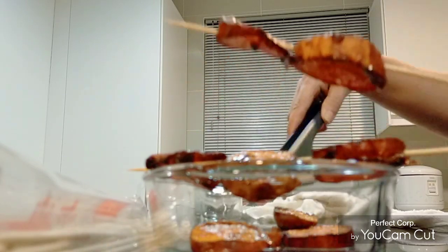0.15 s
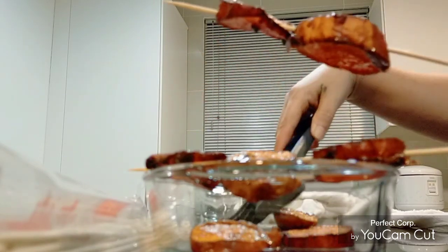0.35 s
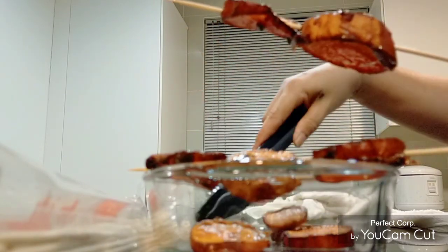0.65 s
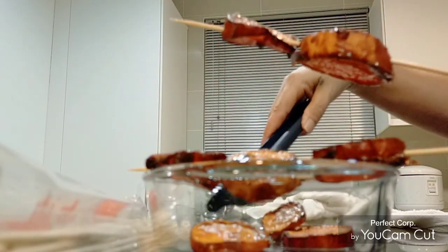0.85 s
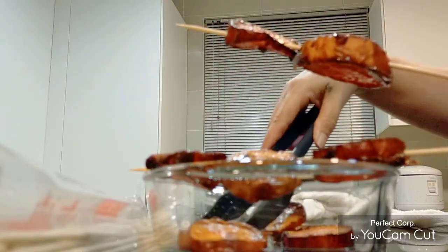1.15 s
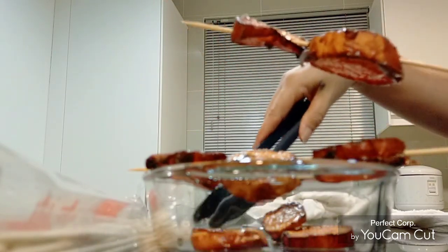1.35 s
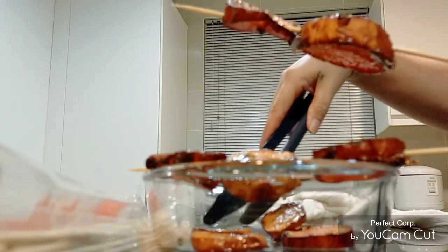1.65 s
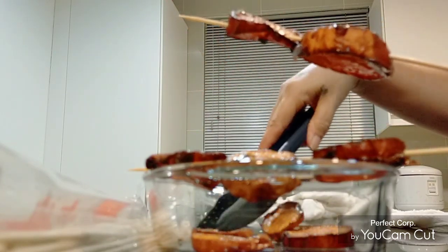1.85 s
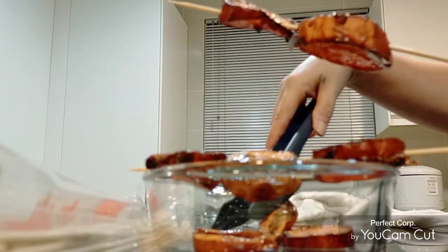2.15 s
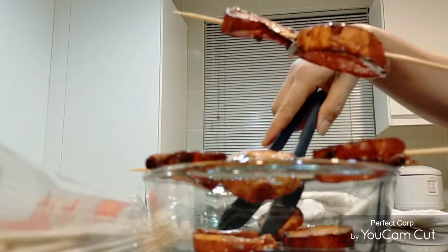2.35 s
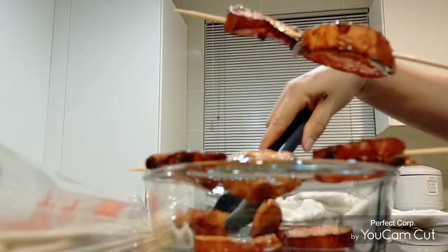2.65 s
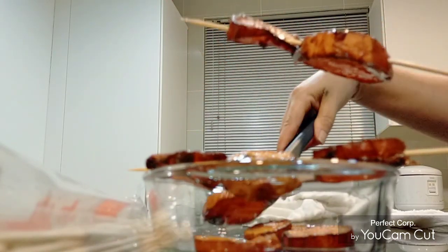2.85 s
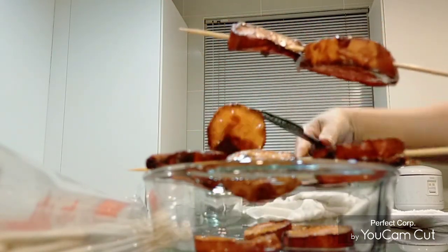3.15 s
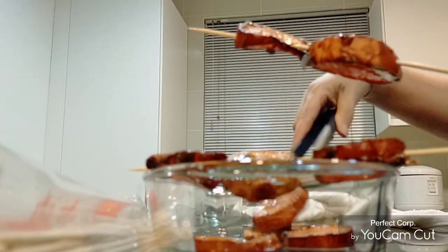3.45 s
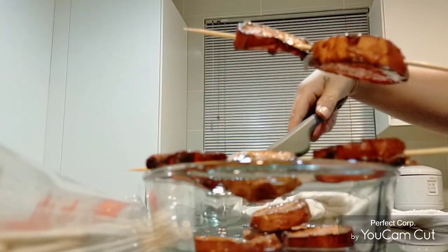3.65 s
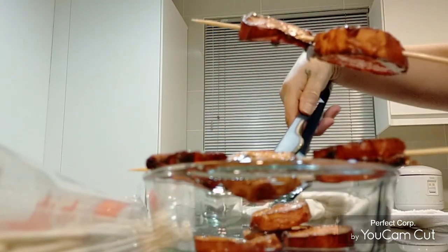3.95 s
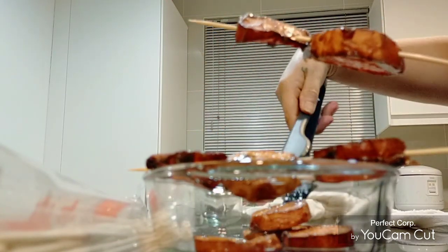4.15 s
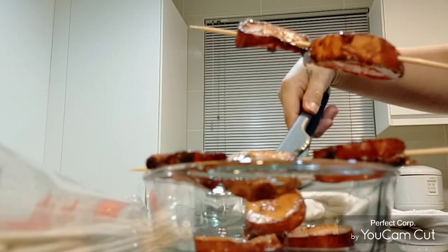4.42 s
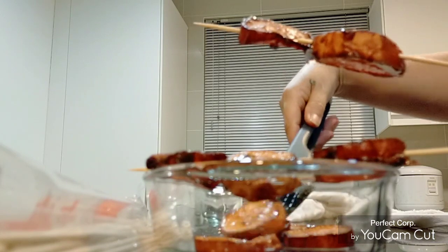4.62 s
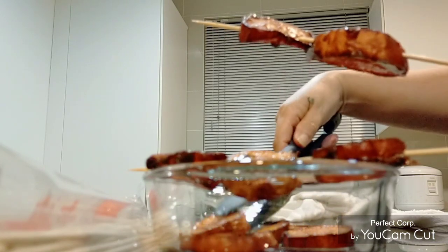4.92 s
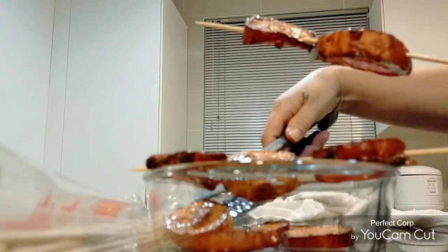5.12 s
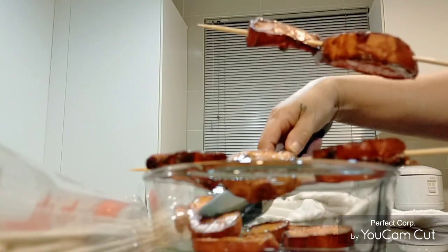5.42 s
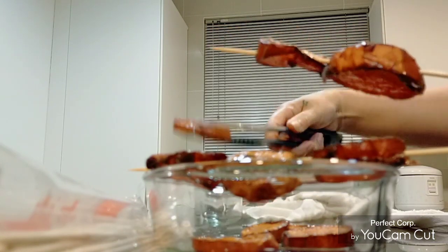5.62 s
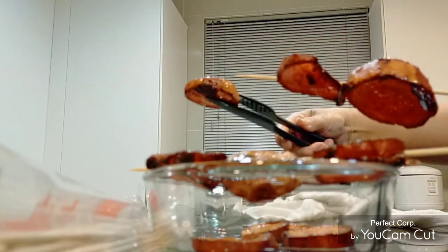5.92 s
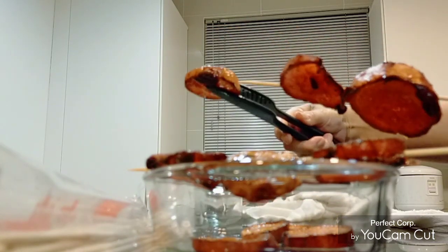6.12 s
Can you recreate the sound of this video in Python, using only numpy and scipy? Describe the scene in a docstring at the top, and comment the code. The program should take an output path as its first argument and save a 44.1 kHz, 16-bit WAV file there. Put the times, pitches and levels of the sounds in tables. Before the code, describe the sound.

Plastic-tipped tongs knock and clink against a glass bowl of sticky food, close by, over a faint appliance hum.

```python
"""Tongs in a glass bowl

Plastic-tipped tongs pick glazed slices of food out of a glass bowl, close by, in a small hard-walled
kitchen. Each knock rings the food-damped bowl and the arms of the tongs in its own proportion.
The sticky glaze crackles softly under the tips. An appliance hums behind it all, and its low
drone steps up once."""
import sys
import numpy as np
from scipy import signal
from scipy.fft import rfft, irfft
from scipy.io import wavfile
from scipy.ndimage import map_coordinates

SR = 44100
rng = np.random.default_rng(int(sys.argv[2]) if len(sys.argv) > 2 else 0)


def store_pcm(level_fs):
    """Save levels as 16-bit WAV."""
    pcm = np.round(np.clip(level_fs, -1, 1) * 32767).astype(np.int16)
    wavfile.write(sys.argv[1], SR, np.atleast_2d(pcm).T)


N = 276987


def from_db(db):
    """Amplitude ratio of a level in decibels."""
    return 10 ** (np.asarray(db) / 20)


def unit_rms(x):
    """Normalisation to unit mean power."""
    return x / np.sqrt(np.mean(x ** 2) + 1e-20)


def at_hz(points, hz):
    """Interpolation of (f/Hz, value) points on a logarithmic frequency axis."""
    f, value = np.transpose(points)
    return np.interp(np.log(np.maximum(hz, 1)), np.log(f), value)


def butter(x, hz, kind, order=2):
    """Causal Butterworth filter."""
    return signal.sosfilt(signal.butter(order, np.clip(hz, 10, .45 * SR), kind, fs=SR, output="sos"), x)


def colour(x, spectrum):
    """Zero-phase spectral shaping by (f/Hz, level/dB) points."""
    return irfft(rfft(x) * from_db(at_hz(spectrum, np.fft.rfftfreq(len(x), 1 / SR))), len(x))


def drift(knots_per_s):
    """Smooth random process of unit rms: a cubic spline through Gaussian values."""
    knots = rng.standard_normal(int(knots_per_s * N / SR) + 4)
    return unit_rms(map_coordinates(knots, [1 + np.arange(N) * knots_per_s / SR], order=3))


def wavering_tone(t, hz, unsteadiness, knots_per_s=9.0):
    """Narrow-band modulation: a steady phasor plus a random one wavers in amplitude and phase."""
    steady = np.sqrt(2 * (1 - unsteadiness ** 2))
    wander = unsteadiness * (drift(knots_per_s) + 1j * drift(knots_per_s))
    return np.real((steady + wander) * np.exp(2j * np.pi * (hz * t + rng.random())))


def appliance(drone_hz=135.8, drone_db=-63, step_s=4.2, rise_s=.15, step_db=4):
    """Line spectrum over broadband noise: a hum, a drone that steps up once, and a steady rush of air."""
    # partials of the hum: f/Hz, rms level/dB, unsteadiness (0-1)
    partials = [(48.3, -62, .25), (157, -65, .8), (206, -60.5, .6), (298, -67, .8), (4080, -88, 1)]
    # low band of the air noise: f/Hz, relative spectral level/dB
    rumble_spectrum = [(20, 0.5), (32, -5), (42, -18), (75, -10.5), (115, -5.5), (145, -0.5), (200, 2),
                       (300, 1), (400, -3), (500, -3), (680, -4.5), (830, 2.5), (1000, -5)]
    # high band of the air noise: f/Hz, relative spectral level/dB
    hiss_spectrum = [(1000, -4.5), (1300, -4), (1550, -9), (2100, -11.5), (2700, -16), (3400, -25),
                     (4100, -28.5), (5000, -34.5), (6500, -36.5), (8200, -35), (10000, -40.5),
                     (12500, -38.5), (15000, -33.5)]
    rumble_db, hiss_db = -50.5, -56.5
    t = np.arange(N) / SR
    hum = sum(from_db(db) * wavering_tone(t, hz, unsteadiness) for hz, db, unsteadiness in partials)
    step = np.clip((t - step_s) / rise_s, 0, 1)
    drone = from_db(drone_db + step_db * step) * wavering_tone(t, drone_hz, unsteadiness=0.59)
    rumble = butter(colour(rng.standard_normal(N), rumble_spectrum), 1047, "low", order=6)
    hiss = butter(colour(rng.standard_normal(N), hiss_spectrum), 1024, "high", order=6)
    return hum + drone + from_db(rumble_db) * unit_rms(rumble) + from_db(hiss_db) * unit_rms(hiss)


def ring(modes, t, low_hz, top_hz, spot_hz, spot_db=4.5, spot_octaves=0.14, spread_db=0.92):
    """Modal superposition: a blow excites damped sinusoids, chiefly those between its band edges."""
    hz, peak_db, t60 = np.transpose(modes)[:, :, None]
    decay = np.log(1000) / t60
    excitation = 1 / np.sqrt((1 + (low_hz / hz) ** 12) * (1 + (hz / top_hz) ** 4))
    # modes that swing widely at the strike point ring louder
    lift_db = spot_db * np.exp(-.5 * (np.log2(hz / spot_hz) / spot_octaves) ** 2)
    scatter_db = spread_db * rng.standard_normal(hz.shape)
    amplitude = excitation * from_db(peak_db + lift_db + scatter_db) * 2 * decay / SR
    sign = (-1) ** np.arange(len(hz))[:, None]   # neighbours start opposed: close pairs swell and beat
    return np.sum(sign * amplitude * np.exp(-decay * t) * np.sin(2 * np.pi * hz * t), axis=0)


def crack(t, bowl_db, tongs_db, top_hz, t60=0.014, db_per_octave=3.5, usual_top_hz=5000):
    """Modal overlap: countless brief high modes blur into noise, louder and brighter at a hard contact."""
    # contact transient: f/Hz, relative level/dB
    spectrum = [(1000, -12), (2500, 13), (4500, -2), (6300, -5.5), (8300, -2), (9500, -3.5), (12000, -5.5),
                (15000, 1.5)]
    fade = from_db(-60 * t / t60)
    burst = colour(rng.standard_normal(len(t)), spectrum) * fade / np.linalg.norm(fade)
    burst = butter(burst, 950, "high", order=4)
    strength = from_db(bowl_db - 16) + from_db(tongs_db - 9.5)   # both bodies contribute
    hardness = from_db(db_per_octave * np.log2(top_hz / usual_top_hz))
    return strength * hardness * butter(burst, top_hz, "low", order=1)


def knocks():
    """Impact excitation of tongs and glass: a soft contact loses the treble, a glancing one the lows."""
    # blows: t/s, bowl level/dB, tongs level/dB, low edge f/Hz, top edge f/Hz,
    # f/Hz favoured by the strike point
    blows = [(0.406, -28, -18, 1660, 4950, 2010), (0.45, -37, -24.5, 1660, 8000, 2070),
             (0.764, -2, -30, 920, 3670, 1037), (1.298, -26, -27.5, 2900, 15200, 8600),
             (1.386, 1.5, -18, 954, 8900, 990), (1.622, -13.5, -45, 760, 3620, 890),
             (1.864, -24, -25, 780, 9000, 1220), (2.7532, -5, -14, 844, 7560, 1167),
             (2.8379, -9, -11.5, 600, 6500, 850), (3.239, -7, 4, 520, 5000, 1193),
             (3.429, -8.5, 0, 420, 1860, 2580), (3.8767, -8.5, -9.5, 1020, 6500, 3070),
             (4.046, -1.5, -10.5, 1304, 3200, 1350), (4.2251, -5, -16, 1325, 4250, 1360)]
    # modes of the bowl, the low ones damped by the food, a close pair ringing on above them:
    # f/Hz, resonance peak level/dB, t60/s
    bowl_modes = [(871.6, 22.5, 0.045), (997, 20, 0.019), (1072, 22, 0.018), (1283, 23, 0.011),
                  (1351, 21.5, 0.019), (1806, 8.5, 0.023), (2022, 20, 0.052), (2224, 12.5, 0.041),
                  (2390, 4.5, 0.0095), (3255, 16.5, .3), (3284, 11, .27), (3510, 5, .012), (4626, 13, .085),
                  (4744, 6.5, 0.031), (5510, -4.5, 0.015), (5750, -0.5, 0.063), (7080, -9, 0.027),
                  (7480, -1.5, 0.019), (8310, 3.5, 0.022), (10700, -7, 0.046), (11500, -11, .03)]
    # modes of the arms of the tongs: f/Hz, resonance peak level/dB, t60/s
    tongs_modes = [(502, 10.5, 0.042), (863, 19, 0.039), (1140, 13, 0.028), (1292, 15.5, 0.046),
                   (1410, 23.5, 0.069), (1626, 15, 0.026), (1943, 11.5, 0.029), (2139, 17.5, 0.049),
                   (2585, 16.5, 0.029), (2900, 4, 0.033), (3030, -3, 0.007), (3992, 15, 0.036),
                   (5450, -1.5, 0.046), (5830, 5, 0.064), (6400, 2, 0.23), (7480, 2.5, 0.065),
                   (8060, 0, 0.032), (10100, -1, 0.065)]
    out, t = np.zeros(N), np.arange(2 * SR // 3) / SR
    for onset_s, bowl_db, tongs_db, low_hz, top_hz, spot_hz in blows:
        bowl = from_db(bowl_db) * ring(bowl_modes, t, low_hz, top_hz, spot_hz)
        tongs = from_db(tongs_db) * ring(tongs_modes, t, low_hz, top_hz, spot_hz)
        # small bodies radiate little below their lowest sounding mode
        bodies = butter(bowl + tongs, 0.66 * low_hz, "high")
        # hand and tongs keep moving, so every knock finds its own pattern of reflections
        knock = kitchen(bodies + crack(t, bowl_db, tongs_db, top_hz))
        start = round(onset_s * SR)
        out[start:start + len(knock)] += knock[:N - start]
    return out


def kitchen(x, near_db=-4.0, near_t60=0.044, build_up_s=0.013):
    """Reverberation: direct sound, early reflections off worktop and dishes, a diffuse tail off walls."""
    # strength of the tail: f/Hz, level/dB
    tail_levels = [(400, 8), (850, 3.5), (1250, -11.5), (2000, -7.5), (5000, -11), (8000, -3), (15000, -5)]
    # reverberation time: f/Hz, t60/s
    tail_t60 = [(400, 0.36), (1000, 0.49), (3000, 0.77), (8000, 0.5), (15000, 0.31)]
    size = 2 * SR // 3
    t, hz = np.arange(size) / SR, np.fft.rfftfreq(size, 1 / SR)
    white = rfft(rng.standard_normal(size))
    build_up = np.clip(2 * t / build_up_s - 1, 0, 1)
    centres_hz, tail = np.geomspace(250, 16000, 13), 0
    for centre, weights in zip(centres_hz, np.eye(len(centres_hz))):
        band = irfft(white * at_hz(np.c_[centres_hz, weights], hz), size)   # triangular pass band
        fade = build_up * from_db(-60 * t / at_hz(tail_t60, centre))
        tail += from_db(at_hz(tail_levels, centre)) * band * fade / np.linalg.norm(fade)
    near = rng.standard_normal(size) * from_db(-60 * t / near_t60) * (t > .001)
    # small things scatter only short waves
    near = butter(near / np.linalg.norm(near), 1500, "high", order=1)
    return x + signal.fftconvolve(x, tail + from_db(near_db) * near)[:len(x)]


def glaze(snaps_per_s=3500, size_db=6.5, sigma_s=.031):
    """Shot noise: tiny sticky threads and bubbles snap at random while the tips press on the food."""
    # glaze squeezed and peeled by the tips, in Gaussian swells: centre t/s, rms level at the centre/dB
    squeezes = [(0.475, -65.5), (0.602, -58.5), (1.3, -64), (1.79, -67), (2.57, -64), (2.645, -67),
                (4.995, -75)]
    # spectrum of a snap: f/Hz, relative level/dB
    spectrum = [(1500, 14.5), (4000, 1), (6000, -7), (8300, -2), (10000, -11.5), (12500, -2), (15000, -2)]
    t = np.arange(N) / SR
    press = sum(from_db(db) * np.exp(-.5 * ((t - centre_s) / sigma_s) ** 2) for centre_s, db in squeezes)
    sizes = from_db(size_db * np.minimum(rng.exponential(1, N), 4))
    signs = rng.choice([-1, 1], N)
    snaps = sizes * signs * (rng.random(N) < snaps_per_s / SR)
    return press * unit_rms(butter(colour(snaps, spectrum), 1500, "high"))


def scene():
    """Linear superposition in one channel: knocks and glaze in the room, over the appliance."""
    return (knocks() + kitchen(glaze()) + appliance())[None]


def record(dry):
    """Band limiting: an elliptic low-pass cuts the top steeply."""
    cutoff_hz = 15600
    return signal.sosfilt(signal.ellip(10, .1, 70, cutoff_hz, fs=SR, output="sos"), dry)


dry = scene()
out = record(dry)
store_pcm(out)
```